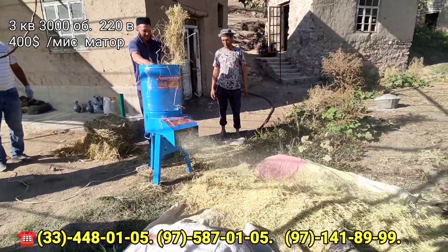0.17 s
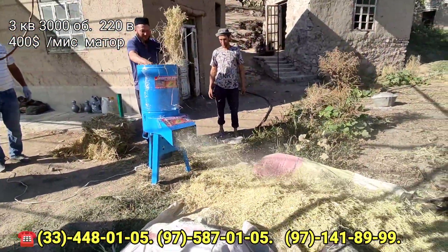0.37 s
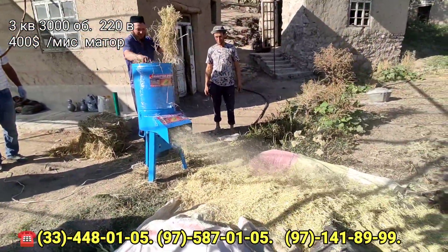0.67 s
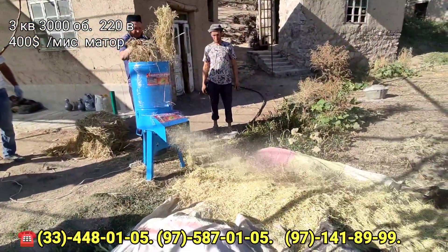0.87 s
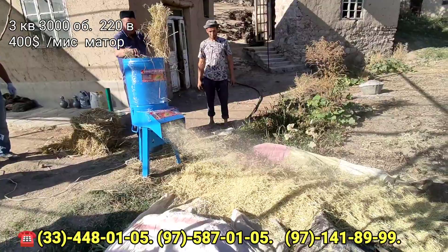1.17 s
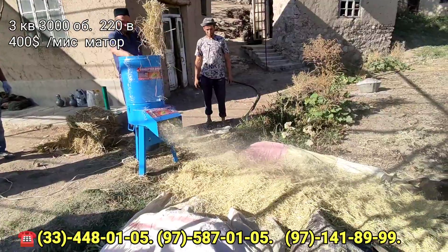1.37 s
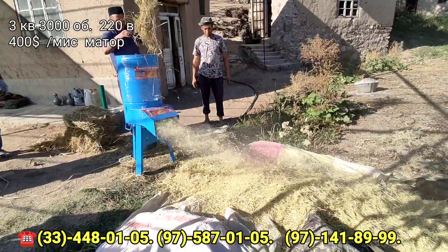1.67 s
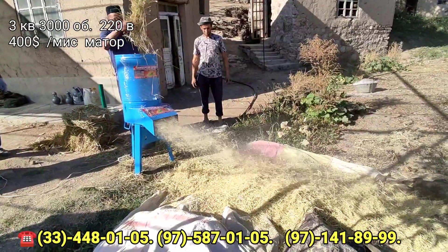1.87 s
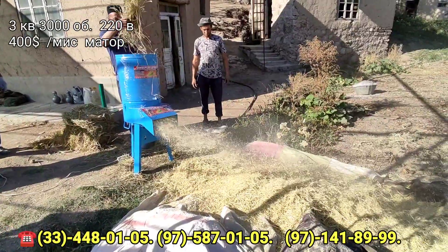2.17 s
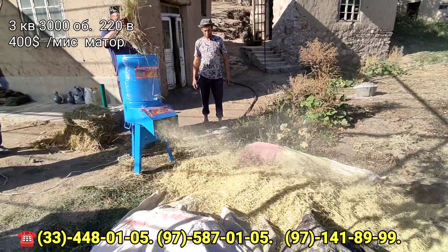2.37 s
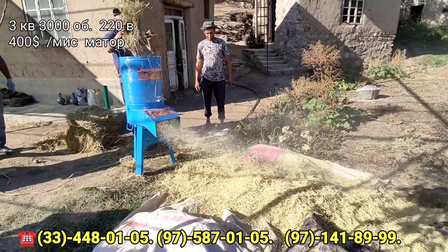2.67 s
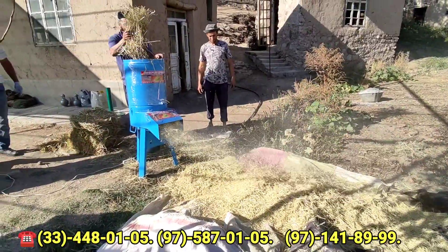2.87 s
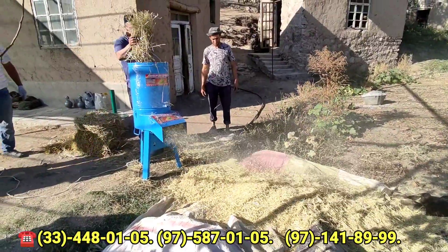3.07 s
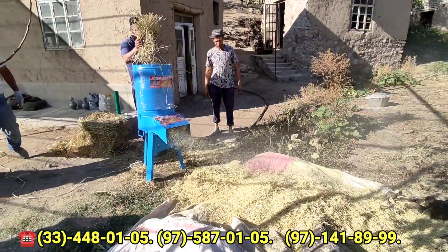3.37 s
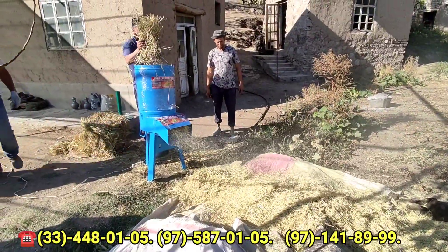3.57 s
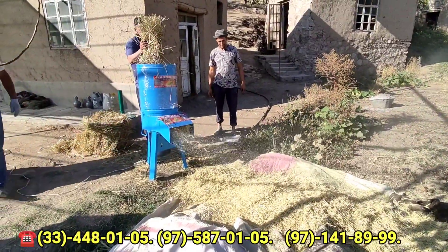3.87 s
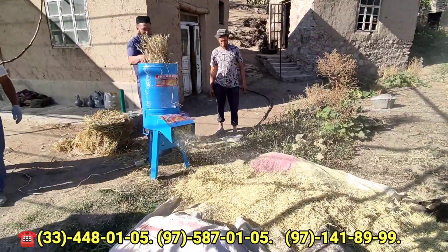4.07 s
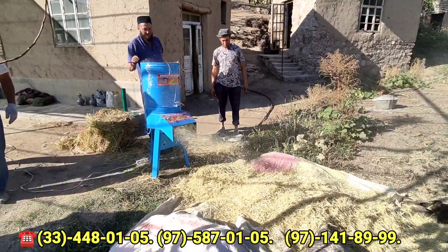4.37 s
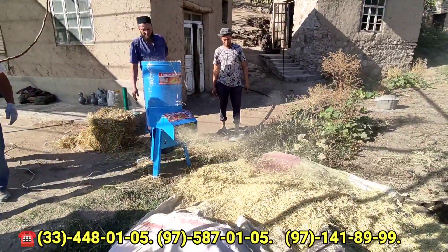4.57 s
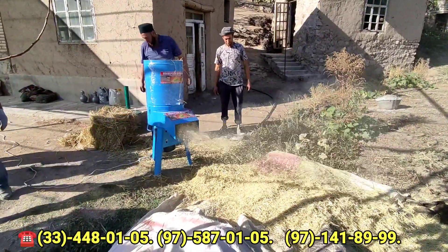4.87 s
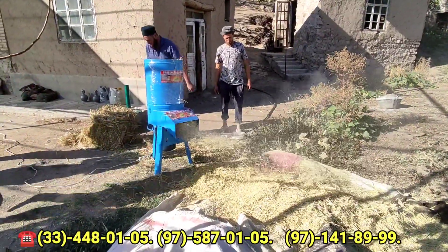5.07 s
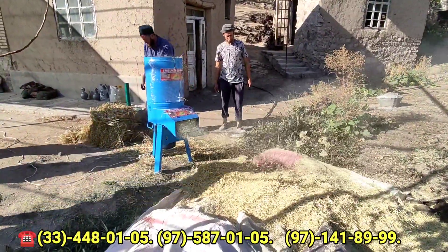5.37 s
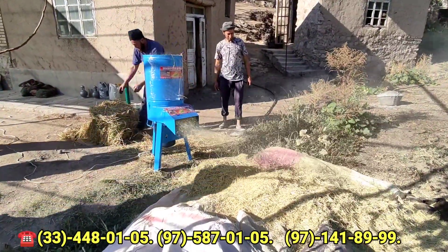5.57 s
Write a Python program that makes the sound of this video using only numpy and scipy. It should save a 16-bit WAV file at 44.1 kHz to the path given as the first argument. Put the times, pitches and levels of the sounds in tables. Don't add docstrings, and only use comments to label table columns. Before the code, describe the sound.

Close by in an open yard, an electric straw chopper drones with a buzzing hum and hollow metal drum roar. Straw sprays out in a dense, bright hiss that swells with each wad and thins around three and a half seconds before surging again. The pitch sags near two seconds and recovers. Thick stalks crack against the casing, and wind thumps the hand-held phone, mostly on the right.

```python
import sys
import numpy as np
from scipy import signal
from scipy.fft import rfft, irfft
from scipy.io import wavfile
from scipy.ndimage import uniform_filter1d

SR = 44100
rng = np.random.default_rng(int(sys.argv[2]) if len(sys.argv) > 2 else 0)


def unload_wav(signal):
    wavfile.write(
        sys.argv[1],
        SR,
        np.round(np.clip(np.atleast_2d(signal).T, -1, 1) * 32767).astype(np.int16),
    )


N = 251811
T = np.arange(N) / SR
HZ = np.fft.rfftfreq(N + 69, 1 / SR)
USUAL_SPRAY_DB = -22


def gain_of(db):
    return 10 ** (np.asarray(db) / 20)


def evened(x):
    return x / np.sqrt(np.mean(x ** 2) + 1e-20)


def read(points, hz):
    f, value = np.transpose(points)
    return np.interp(np.log(hz + 1), np.log(f + 1), value)


def curves(rows):
    s, *columns = np.transpose(rows)
    return [np.interp(T, s, column) for column in columns]


def shaped(x, gain):
    size = 2 * len(HZ) - 2
    return irfft(rfft(x, size) * gain, size)[..., :N]


def resonance(hz, width):
    return 1 / (1 + 2j * (HZ - hz) / width)


def flutter(hz):
    return evened(shaped(rng.standard_normal(N), 1 / (1 + (HZ / hz) ** 4)))


def surges(rows, floor_db, rise_s=None):
    t = T[::64]
    power = gain_of(2 * floor_db)
    for s, db, length in rows:
        u = t - s
        if rise_s:
            loss = np.maximum(u, 0) / length + (np.minimum(u, 0) / rise_s) ** 2
        else:
            loss = (u / length) ** 2
        power = power + gain_of(2 * db) * np.exp(-loss)
    return np.interp(T, t, 10 * np.log10(power))


# (time [s], speed [turns per s])
ROTOR_SPEED = [(0.0, 49.08), (0.75, 48.5), (0.92, 47.95), (1.05, 48.08), (1.35, 47.84), (1.5, 48.37),
               (1.65, 47.28), (1.8, 46.86), (2.1, 44.8), (2.25, 44.5), (2.55, 46.53), (2.7, 46.83),
               (3.0, 48.08), (3.3, 48.9), (3.75, 49.18), (4.36, 49.26), (4.53, 47.15), (5.71, 48.55)]
LOUD_ORDERS = (3, 5, 12, 18)
# (frequency [Hz], width [Hz], level on it [dB])
FRAME = [(137.5, 55, -37), (239.5, 6.6, -36), (593, 22, -33.5), (841, 150, -34)]
# (time [s], lift of each of the four strong orders [dB])
WALL_ECHO = [(0, -4, 2, 4.5, 1), (.8, -4, -5.5, 2, -2), (1.2, 0, 2, 2, 1), (1.8, 1, -1.5, 1, 0),
             (2.6, 0, -13, 5.5, -2), (3.05, 2, 1, 2, -1), (3.5, -2, 1, -2.5, -1.5), (4.3, -3, -3, -3.5, 2),
             (4.7, -3, -0.5, -8, 1), (5.15, 4, -7, 0, 2.5), (5.71, -3, 4.5, -2.5, -1.5)]
QUIET_ORDERS = (2, 6, 7, 14, 15, 16, 22, 24, 30, 34)
QUIET_DB = (-47.5, -40.5, -45.5, -47.5, -52, -51.5, -53.5, -41.5, -55.5, -43.5)


def rotor():
    speed = uniform_filter1d(curves(ROTOR_SPEED)[0], size=3000)
    turns = np.cumsum(speed * (1 + 0.0008 * flutter(hz=6))) / SR
    levels_db = []
    for order, (hz, width, db), lift_db in zip(LOUD_ORDERS, FRAME, curves(WALL_ECHO)):
        off_peak_db = 20 * np.log10(1 + (2 * (order * speed - hz) / width) ** 2)
        levels_db.append(db - off_peak_db + lift_db + 0.4 * flutter(hz=0.67))
    levels_db += list(QUIET_DB)
    out = np.zeros((2, N))
    for order, db in zip(LOUD_ORDERS + QUIET_ORDERS, levels_db):
        wave = np.cos(2 * np.pi * (order * turns + rng.random() + 0.029 * flutter(hz=3.2)))
        out += np.sqrt(2) * gain_of(db + 1.46 * flutter(hz=17)) * wave
    return out


# (time [s], spray level [dB], clearing time [s])
WADS = [(0.01, -23, 0.1), (0.19, -24, 0.33), (0.43, -22.5, 0.065), (0.55, -22.5, 0.044),
        (0.82, -17.5, 0.04), (0.98, -24.5, 0.031), (1.12, -21, 0.12), (1.22, -22.5, 0.12),
        (1.55, -20, 0.42), (1.6, -19, 0.022), (1.79, -21.5, 0.6), (1.84, -20.0, 0.028), (1.99, -21, 0.089),
        (2.1, -31.5, 0.017), (2.25, -22.5, 0.043), (2.58, -23, 0.1), (2.74, -27.5, 0.011),
        (2.86, -23, 0.015), (3.23, -29.5, 0.02), (3.4, -40, 0.6), (3.45, -25.5, 0.033),
        (3.88, -27.5, 0.014), (4.06, -31.5, 0.052), (4.4, -20.5, 0.45), (4.45, -19, 0.057),
        (4.97, -18.5, 0.11), (5.59, -21.5, 0.02), (5.69, -28, 0.018)]


def feed():
    return surges(WADS, floor_db=-28, rise_s=0.033) + 0.66 * flutter(hz=19.6)


# (frequency [Hz], width [Hz], level [dB])
DRUM = [(754, 139, 5), (884, 173, 2.5), (1107, 180, -2), (1347, 200, -1.5), (1465, 150, -2),
        (1740, 160, -3.5), (2250, 430, -7.5)]
# (frequency [Hz], width [Hz], level [dB])
PANELS = [(125, 83, -4), (318.6, 75, 2.5), (440, 56, -3)]


def drum(feed_db):
    more_db = feed_db - USUAL_SPRAY_DB
    air = rng.standard_normal((2, N)) * gain_of(0.98 * flutter(hz=26.2))
    whirl_db = -30 + 0.35 * more_db + 0.78 * flutter(hz=12)
    boom_db = -36.5 + 0.95 * more_db + 2.1 * flutter(hz=7.3)
    out = 0
    for modes, level_db in ((DRUM, whirl_db), (PANELS, boom_db)):
        power = sum(gain_of(2 * db) * abs(resonance(hz, width)) ** 3 for hz, width, db in modes)
        out = out + gain_of(level_db) * evened(shaped(air, np.sqrt(power)))
    return out


def snaps(per_s, spread_db):
    happens = rng.random(N) < per_s / SR
    size = gain_of(spread_db * np.minimum(rng.exponential(1, N), 5)) * happens
    size = np.sqrt(signal.lfilter([1], [1, -0.9], size ** 2))
    return (evened(size) + 3.8) * rng.standard_normal((2, N))


# (frequency [Hz], level [dB per Hz])
SNAP_COLOUR = [(900, -40), (1600, -1.5), (2500, -7.5), (3500, -1.5), (5000, -1.5), (7000, -0.5),
               (10000, -2), (14000, -6)]
# (time [s], thick stalks [dB], fine dust [dB])
STRAW_MIX = [(0, 0.5, 3), (.35, -1, 1.5), (.9, -0.5, 0.5), (1.3, -0.5, 0), (1.8, -2, -1.5),
             (2.2, -0.5, -1.5), (2.8, -2.5, 0), (3.2, 1, -0.5), (3.6, 2, 0.5), (4.3, 0, 0), (4.6, 0, -1),
             (5.1, 1.5, 0), (5.71, 0.5, 0.5)]


def spray(feed_db):
    crackle = snaps(per_s=2200, spread_db=1.0) * gain_of(0.82 * flutter(hz=30.5))
    x = shaped(crackle, gain_of(read(SNAP_COLOUR, HZ)))
    low = shaped(x, 1 / (1 + (HZ / 4300) ** 6))
    high = shaped(x, 1 / (1 + (9000 / (HZ + 1)) ** 8))
    stalks_db, dust_db = curves(STRAW_MIX)
    heavy_db = -1.87 + stalks_db - 0.21 * (feed_db - USUAL_SPRAY_DB) + 0.69 * flutter(hz=7.1)
    x += low * (gain_of(heavy_db + 2.6 * flutter(hz=39.3)) - 1)
    x += high * (gain_of(dust_db + 1.14 * flutter(hz=25)) - 1)
    return gain_of(feed_db - 0.15) * evened(x)


# (time [s], delay of the left port [ms])
TURN = [(0, .124), (.5, .13), (1, .136), (1.5, .144), (2, .15), (2.25, .146), (2.5, .162), (2.9, .15),
        (3.1, .134), (3.35, .121), (3.6, .137), (4.1, .123), (4.35, .128), (4.5, .136), (5.0, .128),
        (5.3, .121), (5.71, .127)]
# (frequency [Hz], lag [radians])
DETOUR = [(600, 0), (1000, .2), (1200, .3), (1500, 1.0), (1880, 1.55), (2250, 4.35), (2800, 5.9),
          (3650, 6.35), (4800, 5.9), (5900, 7.4), (8000, 7.2)]
# (frequency [Hz], likeness [0-1])
LIKENESS = [(100, .95), (800, .93), (1400, .78), (1880, .82), (2050, .4), (2250, .75), (2700, .35),
            (3200, .52), (3700, .81), (4250, .57), (4900, .3), (5900, .7), (7200, .35), (14000, .1)]
# (frequency [Hz], level [dB])
SHADE = [(100, -5), (300, -0.5), (600, -2.5), (860, -3), (1000, 3.5), (1170, 4.5), (1320, -2), (1700, 1),
         (2200, 1), (2600, 2)]


def pair(direct, other):
    hz, t, (near, scattered) = signal.stft([direct, other], SR, nperseg=512, noverlap=384)
    hz = hz[:, None]
    tremble = flutter(hz=8)[np.minimum(t * SR, N - 1).astype(int)]
    delay_ms = np.interp(t, *np.transpose(TURN)) * (1.01 + 0.025 * tremble)
    seen_hz = hz * (delay_ms / 0.135) ** np.clip(hz / 1500 - 1.2, 0.3, 1)
    late = np.exp(-1j * (2 * np.pi * hz * delay_ms / 1000 + read(DETOUR, seen_hz)))
    same = np.clip(read(LIKENESS, seen_hz), 0, 1)
    left = same * late * near + np.sqrt(1 - same ** 2) * scattered
    left = left * gain_of(read(SHADE, hz))
    return np.array([signal.istft(left, SR, nperseg=512, noverlap=384)[1][:N], direct])


# (time [s], level [dB], half length [s])
GUSTS_LEFT = [(0.834, -36, 0.044), (1.124, -39, 0.02), (1.565, -39.0, 0.12), (1.854, -35.0, 0.2),
              (2.267, -44, 0.064), (2.586, -35, 0.12), (3.236, -32, 0.15), (3.517, -35, 0.2),
              (3.875, -32, 0.2), (4.37, -41, 0.063), (4.74, -35, 0.2), (4.848, -27.5, 0.028),
              (5.38, -33.5, 0.2), (5.65, -29, 0.04)]
# (time [s], level [dB], half length [s])
GUSTS_RIGHT = [(0.06, -33.5, 0.22), (0.53, -37, 0.076), (0.94, -42, 0.2), (1.23, -21, 0.024),
               (1.48, -23, 0.065), (1.51, -25, 0.26), (1.91, -20.5, 0.088), (2.21, -24, 0.04),
               (2.34, -27.5, 0.15), (2.64, -36.0, 0.12), (3.23, -22.5, 0.029), (3.46, -25, 0.15),
               (3.92, -25.5, 0.18), (3.98, -22, 0.031), (4.27, -30.5, 0.046), (4.33, -34.0, 0.2),
               (4.7, -29.5, 0.064), (4.76, -27.5, 0.017), (5.03, -28.5, 0.076), (5.04, -35, 0.24),
               (5.49, -30, 0.024), (5.7, -25, 0.12)]
# (left [dB], right [dB])
CALM_DB = (-50, -48)
# (frequency [Hz], level [dB per Hz])
GUST_COLOUR = [(12, 3), (30, 7.5), (90, 1.5), (160, -9), (300, -21), (600, -28.5)]
# (frequency [Hz], level [dB per Hz])
FLAP_COLOUR = [(60, -15), (150, 1), (300, -5), (500, -13), (1000, -23)]
# (time [s], peak [dB], length [ms], below zero for suction)
PUFFS_LEFT = [
    (1.6072, -13, -1),
    (1.7488, -19, -6),
    (3.2176, -17, 3),
    (3.5707, -7.5, 3.5),
    (3.816, -13, 4),
    (4.8514, -12, 2.5),
    (5.6354, -18, -1.5),
]
# (time [s], peak [dB], length [ms], below zero for suction)
PUFFS_RIGHT = [(1.3924, -10, -5.4), (1.4546, -7, 3), (1.4883, -2.5, 3), (1.574, -9, 3.5), (1.76, -11, 3),
               (1.9213, -8, 4), (1.938, -10, 2.5), (1.951, -15, 4), (2.011, -4.5, 2.5), (2.069, -5, 2.5),
               (3.5309, -5, 1.5), (3.9289, -8, 1), (3.9336, -2, 1.7), (3.9536, -3.5, 0.5), (3.9612, -6, 3),
               (3.984, -6, 2.5), (3.9932, -5, 1.5), (4.011, -5, 2), (4.0179, 1.5, 1.2), (4.768, -15, -5),
               (5.67, -4.5, 2)]


def wind():
    lumps = gain_of(3.0 * np.array([flutter(hz=22), flutter(hz=22)]))
    rumble = shaped(rng.standard_normal((2, N)) * lumps, gain_of(read(GUST_COLOUR, HZ)))
    flap = shaped(rng.standard_normal((2, N)) * lumps ** 1.1, gain_of(read(FLAP_COLOUR, HZ)))
    gust_db = np.array([surges(rows, db) for rows, db in zip((GUSTS_LEFT, GUSTS_RIGHT), CALM_DB)])
    out = gain_of(gust_db + 1.2) * evened(rumble)
    out += gain_of(-32 + 1.66 * (gust_db + 25)) * evened(flap)
    t = np.arange(-800, 800) / SR
    for port, rows in enumerate((PUFFS_LEFT, PUFFS_RIGHT)):
        for s, db, ms in rows:
            u = t / (max(abs(ms), 1.2) / 1700)
            puff = np.exp(-u ** 2) - 0.3 * np.exp(-(u / 5.1) ** 2)
            out[port, round(s * SR) - 800:][:len(t)] += np.sign(ms) * gain_of(db) * puff
    return out


# (time [s], peak [dB], decay t60 [s], ring of the casing [dB])
KNOCKS = [
    (0.268, -20, 0.045, -15),
    (0.728, -24, .1, -7),
    (0.9744, -9, 0.13, -10.5),
    (1.396, -23, .1, -14),
    (2.356, -34, 0.065, -13),
    (2.969, -19.5, 0.076, -15),
    (3.436, -25, 0.081, -15),
    (4.186, -33, 0.091, -6),
    (5.683, -21, 0.084, -18),
]
# (frequency [Hz], width [Hz], level [dB])
CASING = [(1760, 140, 6), (3060, 96, -12), (3690, 120, 5)]


def knocks():
    out = np.zeros((2, N + 4000))
    t = np.arange(4000) / SR
    for s, db, t60, ring_db in KNOCKS:
        burst = rng.standard_normal((2, len(t))) * gain_of(-60 * t / t60) * np.minimum(t / 0.0008, 1)
        ring = 0
        for hz, width, mode_db in CASING:
            ring = ring + gain_of(mode_db) * signal.lfilter(*signal.iirpeak(hz, hz / width, SR), burst)
        splinters = signal.lfilter(*signal.butter(1, (2500, 11000), "bandpass", fs=SR), burst)
        out[:, round(s * SR):][:, :len(t)] += gain_of(db) * (splinters + gain_of(ring_db + 10.5) * ring)
    return out[:, :N]


# (frequency [Hz], width [Hz], level [dB])
PORTS = [(10190, 1100, 12), (7740, 2800, 7.5)]


def scene():
    feed_db = feed()
    direct, other = rotor() + drum(feed_db) + spray(feed_db)
    machine = pair(direct, other) + knocks()
    ports = np.array([1 + (gain_of(db) - 1) * resonance(hz, width) for hz, width, db in PORTS])
    return shaped(machine, ports) + wind()


def roll_off(x):
    return signal.sosfilt(signal.butter(12, 15590, fs=SR, output="sos"), x)


def record(dry):
    duck_s = 0.97 + np.cumsum([0, 0.02, 0.059, 0.024])
    duck_db = np.interp(T, duck_s, [0, -4, -4, 0])
    x = np.tanh(dry * gain_of(duck_db) / 0.95) * 0.95
    x = shaped(x, np.clip((14290 - HZ) / 60, 0, 1))
    return roll_off(x)


dry = scene()
out = record(dry)
unload_wav(out)
```